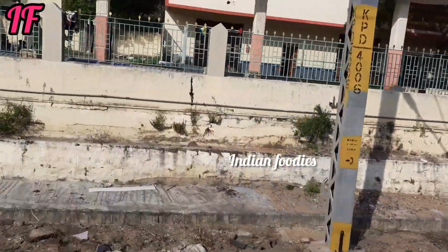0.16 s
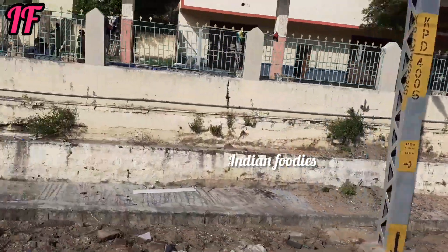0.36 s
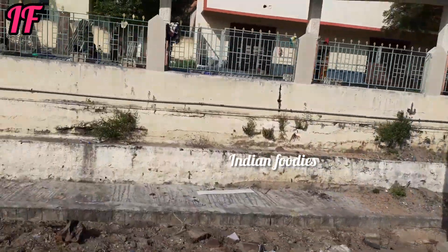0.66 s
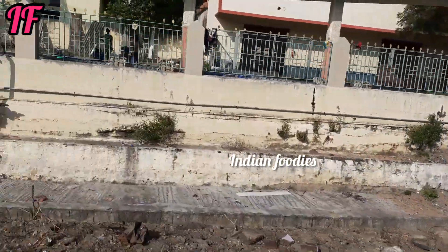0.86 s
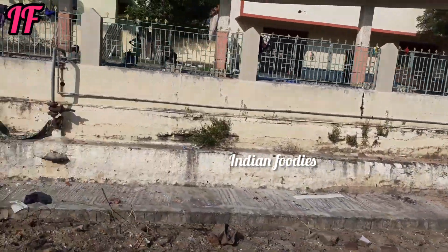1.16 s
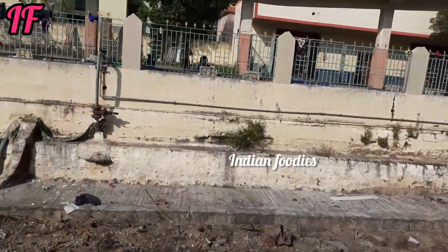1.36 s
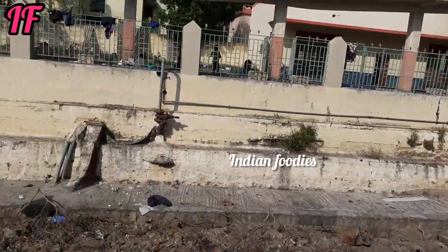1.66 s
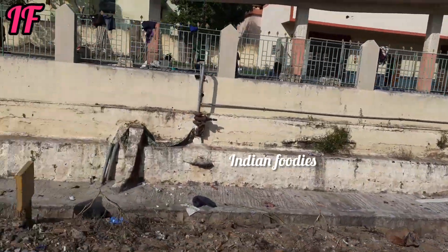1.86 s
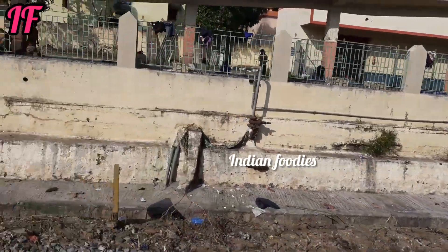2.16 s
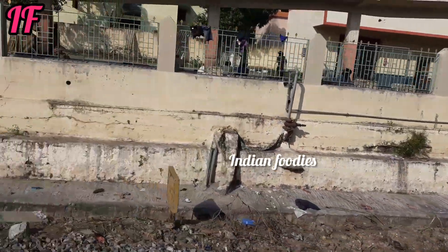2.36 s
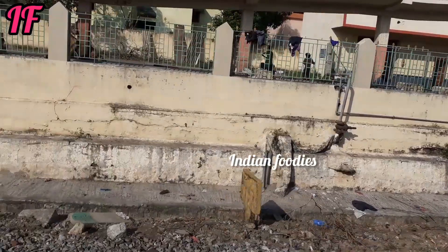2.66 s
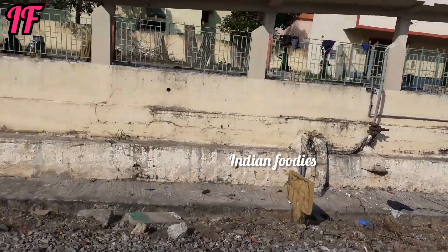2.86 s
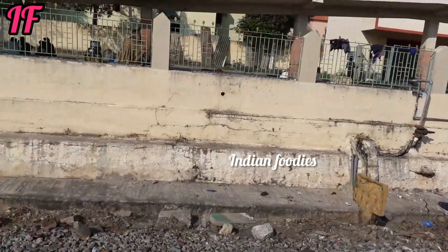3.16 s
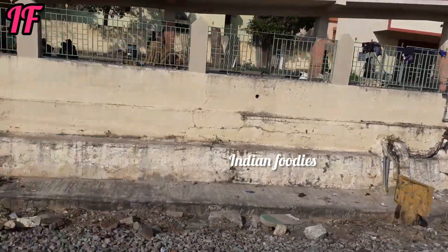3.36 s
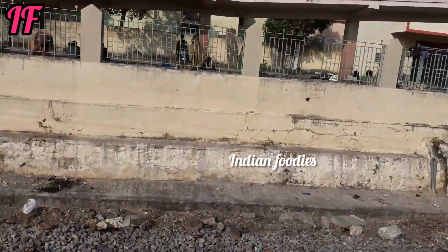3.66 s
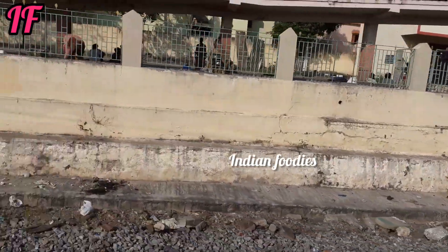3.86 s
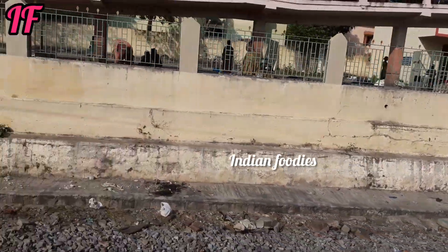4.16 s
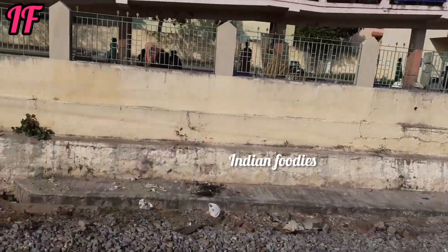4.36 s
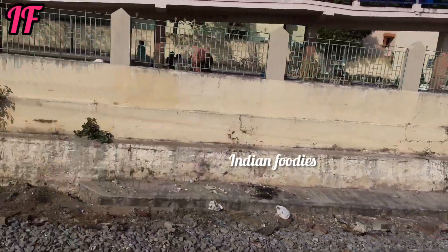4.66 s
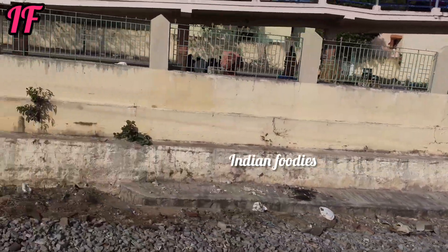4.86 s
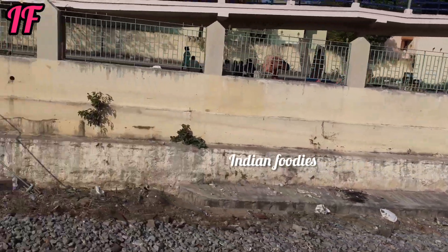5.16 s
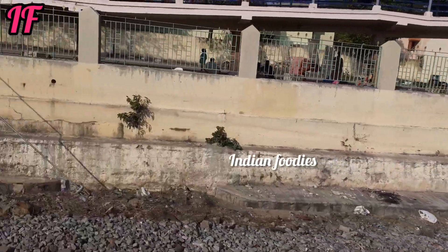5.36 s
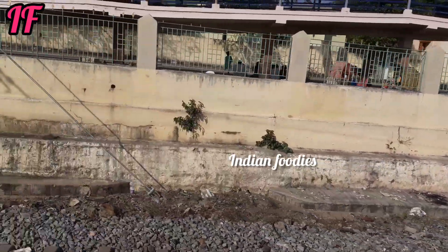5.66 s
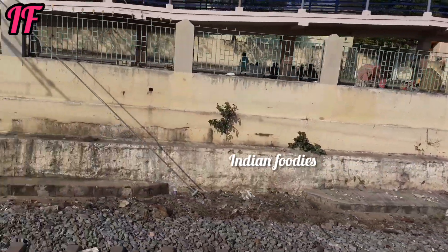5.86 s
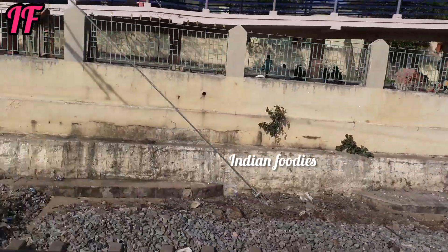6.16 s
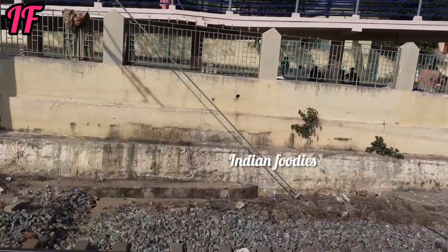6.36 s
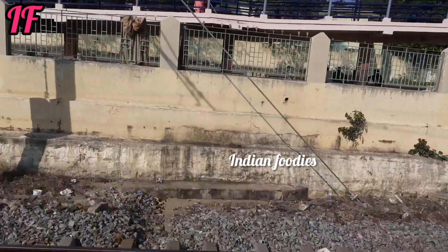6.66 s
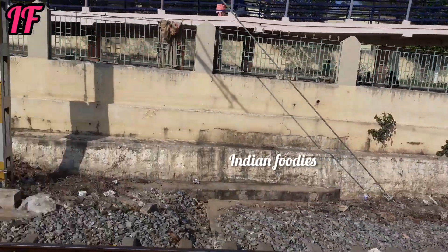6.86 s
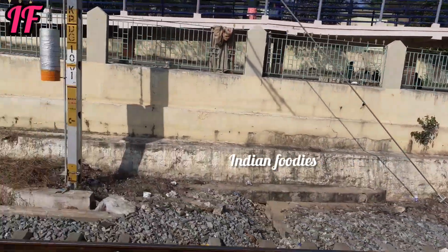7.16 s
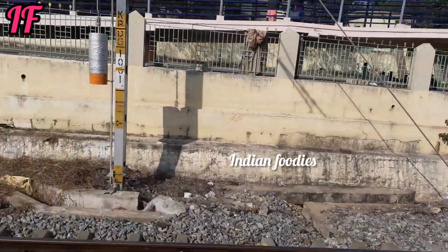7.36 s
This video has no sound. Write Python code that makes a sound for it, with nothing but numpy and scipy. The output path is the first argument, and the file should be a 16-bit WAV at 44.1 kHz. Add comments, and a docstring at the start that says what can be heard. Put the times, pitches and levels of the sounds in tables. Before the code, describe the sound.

Heard in stereo from an open door of a slow passenger train beside a wall: uneven low rumble and roar, bass throbs, clattering rail joints and small rattles. Very high, thin wheel squeals overlap with flickering hiss and metallic grinding for almost five seconds, then thin out. A hard dull knock follows, a short squeal burst, calmer rolling, and a final hiss and bump.

```python
"""Slow train with squealing wheels

A slow passenger train heard from an open carriage door beside a wall. Rough track rumbles and roars as shaped
noise, and the bass near 65 Hz swells and fades. Axles over rail joints, knocks, clanks and rattles excite damped
modes. Wheel flanges rub the rail, hissing and grinding, and stick-slip makes the steel wheels squeal at their
modes. Two spaced microphone ports hear the bass much alike and the treble apart."""
import sys
import numpy as np
from scipy import signal
from scipy.fft import rfft, irfft, next_fast_len
from scipy.io import wavfile
from scipy.ndimage import uniform_filter1d, map_coordinates

SR = 44100
rng = np.random.default_rng(int(sys.argv[2]) if len(sys.argv) > 2 else 0)


def bounce(signal):
    """Save signal as a 16-bit WAV file at the path given by the first command-line argument."""
    frames = np.transpose(np.atleast_2d(signal))
    limited = np.clip(frames, -1, 1)
    pcm = np.round(limited * 32767).astype(np.int16)
    wavfile.write(sys.argv[1], SR, pcm)


N = 331618
FLUTTER_DB_PER_S = 22  # knots a second in the level flutter of squeals and rings


def amp(db):
    """Decibels to an amplitude ratio."""
    return 10 ** (np.asarray(db) / 20)


def unit(x):
    """Normalisation to rms 1."""
    return x / np.sqrt(np.mean(x ** 2) + 1e-20)


def along(points, hz):
    """Interpolation of (frequency_hz, value) points on a logarithmic frequency axis."""
    f, v = np.transpose(points)
    return np.interp(np.log(hz + 1), np.log(f + 1), v)


def curves(rows):
    """Linear envelopes: one value per sample for each column after the time."""
    s, *cols = np.transpose(rows)
    return [np.interp(np.arange(N) / SR, s, c) for c in cols]


def wobble(rate, size=N):
    """Slow random modulation: a smooth curve through random knots, rate of them a second."""
    knots = rng.standard_normal(int(N * rate / SR) + 4)
    return map_coordinates(knots, [np.arange(size) * rate / SR])


def filtered(x, response):
    """Linear filtering: the spectrum of x times a response of frequency."""
    m = next_fast_len(N + SR // 4)
    return irfft(rfft(x, m) * response(np.fft.rfftfreq(m, 1 / SR)), m)[..., :N]


def peak(hz, centre, width):
    """Simple resonance: gain 1 at the centre, 3 dB down at the edges of its width."""
    return 1 / np.sqrt(1 + (2 * (hz - centre) / width) ** 2)


def swell(s, length, rise):
    """Smooth force pulse: a squared sine on warped time; a smaller exponent rise peaks earlier."""
    out = np.zeros(N + SR)
    u = np.linspace(0, 1, round(length * SR))
    out[round(s * SR):][:len(u)] = np.sin(np.pi * u ** rise) ** 2
    return out[:N]


def bumps(t, times, gains_db, half_s):
    """Brief level changes: Gaussian bumps in dB, half_s from the centre to 1/e."""
    return sum(db * np.exp(-((t - s) / half_s) ** 2) for s, db in zip(times, gains_db))


def skirt(half_hz, size):
    """Narrow-band noise: two complex noises through two cascaded one-pole low-passes, so flanks fall steeply."""
    z = rng.standard_normal((2, size)) + 1j * rng.standard_normal((2, size))
    for hz in half_hz, 3 * half_hz:
        z = signal.lfilter([1], [1, -np.exp(-2 * np.pi * hz / SR)], z)
    return z / np.std(z)


def diffuse(gain, broad_db, narrow_db):
    """Partial coherence: noise correlated by frequency between the ports, its level fluctuating by band."""
    # Correlation of the two ports: frequency_hz, correlation (-1 to 1)
    alike = [(80, .74), (430, .78), (690, .52), (860, .25), (980, 0), (1290, -.25), (1470, -.55),
             (1800, -.12), (2300, .1), (3300, -.25), (4000, .25), (5000, 0), (11000, 0), (13000, .15)]
    full_depth_hz = 1800  # the narrow-band fluctuation reaches full depth here
    f, _, z = signal.stft(rng.standard_normal((2, N)), SR, nperseg=1024)
    narrow = uniform_filter1d(rng.standard_normal(z.shape[1:]), size=5, axis=1)
    broad = uniform_filter1d(narrow, size=12, axis=0)
    depth = np.clip(f / full_depth_hz, 0, 1)[:, None]
    field_db = broad_db * unit(broad) + narrow_db * depth * unit(narrow)
    # the fluctuation leaves the mean power of each band about unchanged
    field_db = field_db - field_db.var(1, keepdims=True) * np.log(10) / 20
    pair = signal.istft(z * amp(field_db), nperseg=1024)[1][:, :N]

    def split(hz):
        """Angle that shares power between sum and difference to give the correlation."""
        angle = np.arccos(np.clip(along(alike, hz), -1, 1)) / 2
        return gain(hz) * [np.cos(angle), np.sin(angle)]

    mid, side = filtered(pair, split)
    return np.array([mid + side, mid - side]) / np.std(mid)


def bass_swells(column, fade_s):
    """Exponential envelopes: each swell grows quickly and decays with the time constant fade_s."""
    # Swells of the low rumble and boom: peak_s, boom_db, rumble_db
    swell_rows = [(.04, -33, -30), (.21, -31, -36), (.3, -24, -45), (.35, -32, -47), (.55, -27, -31),
                  (.87, -46, -48), (1.27, -35, -33), (1.37, -34, -33), (1.645, -32, -35),
                  (1.84, -36, -34.5), (1.945, -26.5, -31), (2.14, -24, -38), (2.4, -36, -40),
                  (2.46, -45, -35), (2.55, -45, -35.5), (2.64, -33, -44), (2.85, -51, -34),
                  (3.06, -33, -37), (3.25, -44, -50), (3.3, -48, -37.5), (3.45, -35, -31.5),
                  (3.63, -42, -43), (3.75, -42, -43), (3.92, -36, -37), (3.98, -44, -45), (4.25, -37, -37),
                  (4.54, -47, -41), (4.63, -37, -39), (4.71, -39, -41), (4.88, -44, -41), (5.06, -30, -45),
                  (5.28, -41, -37), (5.35, -30, -34.5), (5.47, -36, -43), (5.67, -37, -44),
                  (5.88, -31, -46), (5.96, -30, -40), (6.09, -36, -30.5), (6.28, -37, -42),
                  (6.62, -34, -49), (6.76, -45, -45.5), (7.1, -36, -48), (7.265, -27, -32),
                  (7.35, -32, -34), (7.46, -33, -41)]
    rise_s = 0.026  # time constant
    t = np.arange(N) / SR
    total = 0
    for row in swell_rows:
        shape = np.exp(np.minimum((t - row[0]) / rise_s, (row[0] - t) / fade_s))
        total = total + amp(row[column]) * shape
    return total


def blows(events, modes, rise_s, scatter_db):
    """Impact response: each blow rings damped modes, the same at both ports, with scattered mode levels."""
    out, t = np.zeros(N + SR), np.arange(SR // 8) / SR
    scatter = scatter_db * rng.standard_normal((len(events), len(modes)))
    for (s, db), spread in zip(events, scatter):
        ring = 0
        for (hz, level, t60), extra_db in zip(modes, spread):
            ring = ring + amp(level + extra_db - 60 * t / t60) * np.sin(2 * np.pi * hz * t)
        out[round(s * SR):][:len(t)] -= amp(db) * ring * (1 - np.exp(-t / rise_s))
    return out[:N]


def track(lumps):
    """Roughness excitation: rough rail shakes the carriage floor and roars off the wall as shaped noise."""
    # Rolling levels: time_s, rumble_db, roar_db
    roll = [(0, -31, -36.5), (.6, -44, -35.5), (.9, -43.5, -38.5), (1.33, -43, -34.5), (1.75, -47, -38.5),
            (2.0, -38.5, -37), (2.45, -45, -38), (2.95, -42, -39), (3.6, -57, -40.5), (4.1, -43, -39),
            (4.45, -56, -40), (5.0, -42, -37.5), (5.55, -52, -39), (5.85, -51, -36.5), (6.4, -51, -40),
            (7.1, -47.5, -36.5), (7.3, -32.5, -34), (7.52, -41, -36.5)]
    # Spectrum of the carriage rumble: frequency_hz, gain_db
    rumble_shape = [(20, -26), (35, -9), (50, 0.5), (65, -8), (85, 3), (100, 0), (120, 1), (160, -4.5),
                    (240, -5.5), (340, -38)]
    # Spectrum of the rolling roar: frequency_hz, gain_db
    roar_shape = [(88, -3.5), (150, -2.5), (484, -5), (1020, -11.5), (1190, -11.5), (1940, -14.5),
                  (2450, -14.5), (2760, -16.5), (2980, -15.5), (5680, -25.5), (6140, -18), (7180, -21),
                  (7620, -36), (14200, -23), (16000, -107)]
    rumble_db, roar_db = curves(roll)
    ripple = wobble(24)
    shaking = np.hypot(amp(rumble_db + 2.6 * lumps), bass_swells(column=2, fade_s=0.036))
    rumble_noise = diffuse(lambda hz: amp(along(rumble_shape, hz)), broad_db=0.0, narrow_db=-4.0)
    roar_noise = diffuse(lambda hz: amp(along(roar_shape, hz)), broad_db=.7, narrow_db=4)
    rumble = shaking * amp(0.57 * ripple) * rumble_noise
    roar = amp(roar_db + 0.5 * lumps + 0.7 * ripple) * roar_noise
    return rumble + roar


def boom(lumps):
    """Narrow-band oscillation: the bass near 65 Hz swells and fades, nearly alike at both ports."""
    floor_hz, idle_db = 65.1, -45  # idle: level between swells, before the lumps
    t = np.arange(N) / SR
    wander = 1.9 * np.array([wobble(18), wobble(18)])  # phase, radians
    mid, side = np.sin(2 * np.pi * floor_hz * t + wander)
    side = .38 * side
    swing = np.hypot(amp(idle_db + 5.1 * lumps), bass_swells(column=1, fade_s=0.027))
    return swing * amp(1.8 * wobble(22)) * np.array([mid + side, mid - side])


def joints():
    """Modal excitation: axles crossing gaps rattle sleepers and rail; a sharper step rings the higher modes."""
    # Axles over rail joints: start_s, level_db, length_s, treble_share (0 to 1)
    crossings = [(0.188, -30.5, 0.21, 0.58), (0.461, -27, 0.21, 0.49), (1.233, -32.5, 0.3, 0.44),
                 (1.565, -30.5, 0.19, 0.38), (1.98, -33.5, 0.22, 0.73), (2.273, -33.5, 0.065, 0.8),
                 (2.314, -31, 0.14, 0.47), (4.085, -40.5, 0.29, .8), (4.987, -37.5, 0.15, 0.58),
                 (5.74, -39, 0.16, 0.9), (6.95, -43.5, 0.26, .8), (7.222, -37, 0.093, 0.3)]
    # Sleeper modes (first two), then higher rail modes: frequency_hz, width_hz, level_db
    rail_modes = [(259, 40, 1.5), (390, 53, 2.5), (575, 37, 0), (766, 290, -1.5), (1040, 110, -10),
                  (1590, 170, -11.5)]
    low_lag_s = 0.017  # the low modes answer after the step
    out = np.zeros((2, N))
    for modes, high in (rail_modes[:2], 0), (rail_modes[2:], 1):
        force = 0
        for s, db, length, share in crossings:
            part = share if high else 1 - share
            force = force + amp(db) * part * swell(s + low_lag_s * (1 - high), length, rise=0.52)
        ring = lambda hz: sum(amp(db) * peak(hz, c, w) for c, w, db in modes)
        out += amp(2.6 * wobble(45)) * force * diffuse(ring, broad_db=.8, narrow_db=1.0)
    return out


def rattles():
    """Damped oscillation: loose parts in the running gear knock, each at its own pitch."""
    # Small knocks: start_s, level_db, pitch_hz
    loose_parts = [(0.124, -28, 178), (0.173, -20, 350), (0.244, -15, 565), (0.261, -18, 248),
                   (0.279, -27, 237), (0.324, -22, 579), (0.476, -22, 468), (0.599, -24, 151),
                   (0.658, -21, 450), (1.384, -27, 221), (1.399, -30, 506), (1.655, -23, 237),
                   (2.029, -27, 799), (2.255, -32, 183), (2.288, -28, 999), (2.291, -27, 638),
                   (2.302, -23, 678), (2.329, -26, 269), (2.439, -25, 175), (2.529, -26, 282),
                   (2.78, -29, 488), (2.886, -26, 396), (2.999, -31, 159), (3.287, -32, 151),
                   (3.39, -30, 223), (3.424, -28, 213), (3.539, -34, 412), (3.721, -34, 151),
                   (3.877, -28, 202), (4.054, -32, 240), (4.089, -32, 490), (4.169, -26, 842),
                   (4.225, -31, 280), (4.279, -28, 151), (4.392, -37, 423), (4.464, -34, 474),
                   (4.601, -29, 183), (4.699, -31, 256), (4.774, -27, 277), (4.824, -28, 170),
                   (4.848, -22, 269), (4.966, -26, 272), (5.136, -31, 662), (5.195, -25, 546),
                   (5.351, -30, 304), (5.464, -33, 170), (5.565, -32, 439), (5.61, -33, 369),
                   (5.668, -33, 285), (6.446, -33, 538), (6.517, -24, 417), (6.641, -21, 482),
                   (6.81, -35, 269)]
    cycles, rise_s = 12.3, 0.0018  # cycles to die by 60 dB; time constant of the onset
    out, t = np.zeros(N + SR), np.arange(SR // 10) / SR
    for s, db, hz in loose_parts:
        decay = amp(db - 60 * t * hz / cycles)
        onset = 1 - np.exp(-t / rise_s)
        out[round(s * SR):][:len(t)] -= decay * np.sin(2 * np.pi * hz * t) * onset
    return out[:N]


def knocks():
    """Panel impact: dull blows ring a few heavily damped modes of the carriage body."""
    # Knocks: start_s, level_db
    knock_rows = [(1.243, -26), (1.919, -23), (2.616, -43), (2.827, -17), (3.414, -44), (3.592, -21.5),
                  (5.259, -11), (5.276, -15), (6.622, -23), (6.746, -14), (7.215, -27), (7.242, -33)]
    # Panel modes: frequency_hz, level_db, t60_s
    panel = [(119, -20, 0.034), (214, 0, 0.038), (320, -20, 0.014)]
    return blows(knock_rows, panel, rise_s=0.0039, scatter_db=1.5)


def clanks():
    """Steel impact: sharp blows of wheel on rail end ring short modes with a quick onset."""
    # Blows: start_s, level_db
    clank_rows = [(0.21, -20), (0.248, -18), (0.271, -15), (0.476, -26), (0.496, -20), (0.516, -18),
                  (0.533, -24), (1.255, -26.5), (1.281, -23), (1.295, -23), (1.343, -28), (1.365, -19),
                  (1.444, -33), (1.636, -26), (1.961, -17), (2.02, -22), (2.064, -23), (2.288, -30),
                  (2.296, -25), (2.358, -22), (2.499, -22), (2.737, -17), (4.136, -28), (4.507, -25),
                  (4.814, -30), (5.033, -26), (5.747, -35), (5.778, -36), (6.145, -18), (6.903, -22)]
    # Modes of a blow: frequency_hz, level_db, t60_s
    clank_modes = [(150, -8, 0.025), (270, -8, 0.022), (410, -5.5, 0.031), (587, -9.5, 0.022),
                   (796, -10, 0.021)]
    return blows(clank_rows, clank_modes, rise_s=0.0012, scatter_db=2.5)


def rings():
    """Modal ringing: a mode of wheel or rail sings for a moment, rough and fluttering."""
    # Brief rings: start_s, pitch_hz, level_db, length_s
    ring_rows = [(.22, 234, -29, .11), (.235, 580, -29, .07), (1.3, 2750, -43, .11), (1.35, 1670, -45, .1),
                 (1.88, 1906, -48, .18), (2.37, 3023, -40, .24), (2.74, 2727, -46, .45),
                 (2.93, 1900, -46, .25), (3.58, 1816, -46, .2), (5.78, 5390, -43, .08),
                 (5.8, 12940, -43, .16), (7.27, 12990, -39, .08), (3.95, 1900, -49, .2),
                 (6.3, 6036, -54, .8), (6.65, 2920, -48, .3), (6.64, 2500, -48, .2)]
    rough_db, skirt_hz, flutter_db = -1, 25, 2.5
    out = np.zeros((2, N))
    for s, hz, db, length in ring_rows:
        span = slice(round(s * SR), round((s + length) * SR))
        t = np.arange(span.start, span.stop) / SR
        # phase drift and roughness are weaker below 1500 Hz
        drift = min(1.2, hz / 1500) * np.array([wobble(35, size=len(t)), wobble(35, size=len(t))])
        rough = min(1, hz / 1500) * amp(rough_db) * skirt(skirt_hz, size=len(t))
        swing = np.exp(1j * drift) + rough
        flutter = flutter_db * wobble(FLUTTER_DB_PER_S, size=len(t))
        level = amp(db + flutter) * swell(s, length, rise=0.92)[span]
        out[:, span] += level * np.real(swing * np.exp(2j * np.pi * hz * t))
    return out


def metallic_grains():
    """Granular texture: many short random sine notes, 2 to 5.8 kHz, make the grind metallic."""
    count, length_s = 2600, .042
    low_hz, high_hz = 2000, 5800
    when, pitch, luck, lean = rng.random((count, 4)).T
    t = np.arange(round(length_s * SR))
    hz = low_hz * (high_hz / low_hz) ** pitch
    strength = amp(-3.5 * np.log(1 - .95 * luck))[:, None]  # few notes are loud
    envelope = np.sin(np.pi * (t / len(t)) ** .6) ** 2
    notes = strength * envelope * np.sin(2 * np.pi * np.outer(hz, t) / SR)
    at = ((when * N).astype(int)[:, None] + t).ravel()
    angle = np.pi * lean - np.pi / 4  # outside the first quadrant the ports oppose
    ports = []
    for gain in (np.cos(angle), np.sin(angle)):
        ports.append(np.bincount(at, (notes * gain[:, None]).ravel(), N + len(t))[:N])
    return unit(np.array(ports))


def flange(chatter):
    """Friction noise: the rubbing flange hisses through the modes of the rim; the treads grind lower down."""
    # Flange against rail: time_s, hiss_db, grind_db
    rub = [(0, -32, -48.5), (.27, -31, -48), (.5, -27, -41), (.67, -31.5, -40), (1.03, -39.5, -49),
           (1.19, -37.5, -48), (1.28, -32, -41.5), (1.55, -39.5, -43), (1.8, -46, -47.5),
           (1.88, -32, -43.5), (1.95, -26.5, -46), (2.15, -26.5, -46.5), (2.33, -37.5, -45),
           (2.47, -24, -38.5), (2.7, -30.5, -44.5), (2.88, -26.5, -33.5), (3.15, -32.5, -41.5),
           (3.46, -27.5, -44), (3.58, -33.5, -47), (3.82, -33.5, -47), (4.0, -29.5, -39), (4.25, -29, -41),
           (4.42, -35.5, -47.5), (4.61, -33.5, -42.5), (4.9, -44, -51), (5.28, -51.5, -50),
           (5.745, -53, -53), (5.77, -37, -45), (5.82, -29, -40), (5.88, -32.5, -45), (5.96, -32.5, -44),
           (6.06, -38, -47.5), (6.2, -47.5, -47), (7.235, -49, -52.5), (7.29, -28.5, -45), (7.52, -33, -43)]
    # Moments of harder grip: centre_s, hiss_gain_db, grind_gain_db
    grips = [(.02, 2.5, 5.5), (.12, 2, 7), (.23, 1, 10.5), (2.73, 2.5, 6.5), (3.28, 1, 3.5),
             (3.45, -0.5, 2.5), (3.63, 6, 6), (3.76, 5, 10.5), (3.89, 4, 7), (4.25, 1.5, 2), (4.48, 3, 2.5),
             (4.82, -0.5, 4), (5.81, 0, 0.5), (5.95, 2, 4), (7.48, 0.5, 3)]
    # Wheel modes that colour the rub: frequency_hz, width_hz, level_db (over the hiss, which it adds to)
    rims = [(4331, 60, -5), (4680, 70, -2), (4953, 25, 2), (6036, 60, -3), (6220, 220, -5), (7724, 70, 2),
            (9403, 70, 2), (11074, 30, 0), (11370, 80, 0), (12323, 90, 0), (12674, 50, -2), (12940, 28, 6),
            (13150, 110, 0), (14046, 90, -3), (15062, 60, 2), (15452, 40, 1)]
    # Spectrum of the hiss: frequency_hz, gain_db
    hiss_shape = [(3500, -17), (5000, -5.5), (6000, -2), (7500, 2), (8500, -2), (10000, -3), (12500, -3),
                  (14500, -0.5), (16000, -2.5)]
    # Spectrum of the grind: frequency_hz, gain_db
    grind_shape = [(1300, -13), (1900, -3.5), (2300, -3), (2900, -3.5), (3800, -2.5), (4600, -1.5),
                   (5500, -13)]
    grip_half_s, grains_db = 0.034, -2
    t = np.arange(N) / SR
    hiss_db, grind_db = curves(rub)
    grip_s, hiss_lift, grind_lift = np.transpose(grips)
    hiss_db = hiss_db + bumps(t, grip_s, hiss_lift, grip_half_s)
    grind_db = grind_db + bumps(t, grip_s, grind_lift, grip_half_s)
    surge = wobble(11)

    def hiss_gain(hz):
        """Resonant colouring: broad hiss lifted at the rim modes."""
        return amp(along(hiss_shape, hz)) * (1 + sum(amp(db) * peak(hz, c, w) ** 2 for c, w, db in rims))

    hiss_noise = diffuse(hiss_gain, broad_db=0.9, narrow_db=3.5)
    hiss = amp(hiss_db + 0.59 * surge + 0.42 * chatter) * hiss_noise
    grind_noise = diffuse(lambda hz: amp(along(grind_shape, hz)), broad_db=.2, narrow_db=5)
    grind = grind_noise + amp(grains_db) * metallic_grains()
    return hiss + amp(grind_db + .3 * surge + .8 * chatter) * grind


def squeals(chatter):
    """Stick-slip oscillation: friction keeps a wheel mode swinging; rough contact shakes its size and phase."""
    # Squealing modes: pitch_hz, wander_rad (scales the phase curves), skirt_half_hz,
    # skirt_over_hz (centre above the mode), skirt_db (over the line)
    wheel = [(4331, 1.6, 60, 10, 7), (4685, 1.2, 60, 0, 5), (6036, 1.2, 55, 5, 2), (7150, 1.5, 150, 50, 7),
             (7724, .9, 42, 0, 1), (12323, .6, 100, 65, -.5), (12674, .7, 45, 0, 3), (14046, .6, 95, 60, 3),
             (15062, .9, 45, 15, 1), (5840, 1.5, 60, 0, 6), (13180, 1.5, 50, 0, 8), (13760, 1.5, 50, 0, 8),
             (6190, 1.5, 60, 0, 6)]
    # For each mode, one curve for each squeal: time_s, level_db
    squeal_curves = [
        [[(.66, -56), (.69, -43), (.78, -49), (.85, -46), (.92, -56)], [(1.55, -53), (1.65, -45), (1.7, -58)],
         [(1.95, -64), (2.1, -33), (2.21, -41), (2.31, -36.5), (2.45, -63)]],
        [[(.6, -55), (.66, -41), (.76, -58)], [(1.54, -51), (1.62, -45), (1.68, -60)]],
        [[(.02, -52), (.065, -39), (.12, -52)], [(1.2, -58), (1.3, -61), (1.55, -46), (1.72, -55)],
         [(1.85, -45), (1.9, -40), (2.0, -55), (2.1, -39), (2.3, -50)], [(2.38, -58), (2.49, -40), (2.56, -48),
         (2.76, -46), (3, -49)], [(3.55, -51), (3.7, -37), (3.78, -41), (3.89, -51), (3.92, -39), (4.3, -61),
         (4.6, -45), (4.75, -49), (4.97, -52), (5.1, -52), (5.5, -58), (5.62, -50.5), (5.72, -57)],
         [(5.78, -53), (5.83, -39), (5.9, -31.5), (5.99, -31.5), (6.08, -43), (6.11, -48), (6.15, -45),
         (6.19, -43), (6.21, -58), (6.26, -49), (6.32, -60)]],
        [[(7.24, -50), (7.29, -31), (7.36, -43)]],
        [[(0, -36), (.36, -31), (.6, -39), (.72, -43), (.92, -42), (1.2, -54)], [(1.45, -54), (1.63, -42),
         (1.85, -47.5), (2.02, -41), (2.16, -35), (2.34, -52), (2.54, -46), (2.59, -32), (2.78, -31.5),
         (3.1, -31.5), (3.4, -26.5), (3.57, -36), (3.95, -32.5), (4.1, -29), (4.3, -34), (4.65, -29),
         (4.8, -43.5), (4.96, -50.5), (5.25, -44.5), (5.5, -61)], [(5.98, -56), (6.07, -57), (6.25, -62),
         (6.39, -59), (6.6, -67)], [(7.27, -49), (7.33, -38), (7.49, -33), (7.52, -34)]],
        [[(1.27, -42), (1.34, -33), (1.5, -31.5), (1.68, -29), (1.74, -37), (1.9, -31), (2.2, -31.5),
         (2.3, -28.5), (2.49, -28), (2.54, -35), (2.64, -36), (2.8, -39), (3.1, -48)], [(5.82, -54),
         (5.88, -37), (5.97, -52), (6.1, -51), (6.18, -44), (6.26, -58)]],
        [[(2.5, -36), (2.7, -46), (2.84, -52), (3.06, -43), (3.42, -42), (3.54, -54), (3.63, -45), (3.92, -37),
         (4.1, -38), (4.2, -50), (4.5, -46), (4.65, -35), (4.8, -59)], [(7.33, -46), (7.42, -38), (7.5, -46)]],
        [[(0, -33), (.15, -31), (.2, -38), (.6, -45)], [(1.88, -46), (2.02, -37), (2.3, -38), (2.5, -49)],
         [(3.3, -44), (3.45, -27.5), (3.72, -30.5), (3.87, -38)], [(4.03, -38), (4.12, -29.5), (4.3, -32),
         (4.45, -39), (4.7, -48)]],
        [[(0, -42), (.4, -38), (.55, -35), (.65, -32), (.95, -33.5), (1.12, -45), (1.25, -54)], [(1.88, -48),
         (2.06, -41), (2.14, -35), (2.34, -37), (2.39, -49), (2.5, -44)], [(7.35, -52), (7.45, -44),
         (7.52, -50)]],
        [[(5.75, -48), (5.78, -42), (5.82, -41), (5.88, -57)]],
        [[(1.9, -48), (2.1, -42), (2.25, -50)], [(3.2, -45), (3.28, -36), (3.5, -52), (3.63, -42), (3.74, -44),
         (4.0, -42), (4.2, -50)]],
        [[(3.55, -50), (3.7, -43), (3.82, -44), (4.05, -44)]],
        [[(.36, -50), (.43, -41), (.55, -51)], [(2.42, -46), (2.52, -38), (2.7, -42), (3.0, -49)], [(3.44, -52),
         (3.5, -38), (3.56, -50)], [(3.88, -50), (3.94, -36), (4.02, -47)]],
    ]
    # For each mode, moments when its squeal flares up: centre_s, gain_db
    flare_rows = [
        [],
        [],
        [],
        [],
        [(.132, 5.5), (.206, 8), (.344, 7.5), (.928, 6), (1.72, 7), (1.78, 6), (2.735, 11.5), (2.83, 3),
         (2.89, 7.5), (2.99, 4), (3.095, 0), (3.14, 6.5), (3.6, 8), (3.76, 5), (3.86, 5), (3.93, 7),
         (4.021, 12.5), (4.052, 11.5), (4.385, 9), (4.545, 7), (4.65, 1), (7.364, 10.5)],
        [(1.494, 10), (1.808, 5), (1.976, 3), (2.094, 2), (2.314, 4.5), (2.468, 5), (2.79, 7), (2.894, 10)],
        [(3.92, 8)],
        [(.072, 6), (3.476, 5), (3.57, 6), (3.72, 3), (4.118, 4), (4.236, 9), (4.302, 4), (4.396, 5)],
        [(.476, 6), (.772, 4)],
        [],
        [],
        [],
        [],
    ]
    flutter_db, flare_half_s, fade_s = 2.2, 0.0085, 0.01
    out = np.zeros((2, N))
    for (hz, wander, half_hz, over_hz, rough_db), tables, flares in zip(wheel, squeal_curves, flare_rows):
        for rows in tables:
            s, db = np.transpose(rows)
            start = round(s[0] * SR)
            t = np.arange(start, min(round(s[-1] * SR), N)) / SR
            span = slice(start, start + len(t))
            pair = lambda rate: np.array([wobble(rate, size=len(t)), wobble(rate, size=len(t))])
            steady = np.exp(1j * wander * (pair(40) + 3 * pair(6)))
            rough = amp(rough_db) * skirt(half_hz, size=len(t)) * np.exp(2j * np.pi * over_hz * t)
            # two paths, straight and off the wall, add at one port and oppose at the other
            near, wall = unit(np.real(np.exp(2j * np.pi * hz * t) * (steady + rough)))
            flutter = flutter_db * wobble(FLUTTER_DB_PER_S, size=len(t))
            flare = bumps(t, *np.reshape(flares, (-1, 2)).T, flare_half_s)
            # a squeal already sounding at time 0 has no fade-in
            since_start = t - s[0] + (s[0] == 0)
            fade = np.clip(np.minimum(since_start, s[-1] - t) / fade_s, 0, 1)
            level = fade * amp(np.interp(t, s, db) + flutter + flare + 0.31 * chatter[span])
            out[:, span] += level * np.array([near + 1.0 * wall, near - 0.95 * wall])
    return out


def scene():
    """Superposition: all sources add, some sharing the bumps of the rail or the chatter of the flange."""
    chatter = wobble(25) + 1.34 * wobble(70)  # the flange catches and lets go
    lumps = wobble(16)  # small bumps of the rail
    background = track(lumps) + boom(lumps) + joints()
    hits = rattles() + knocks() + clanks()
    return background + hits + rings() + flange(chatter) + squeals(chatter)


def record(dry):
    """Phase difference and band limits: the right port leads in the low mids; deep bass and top are cut."""
    # Phase lead of the right port over the left: frequency_hz, lead_rad
    right_leads = [(200, 0), (520, .3), (700, .55), (870, .8), (1000, 0)]
    bass_cut_hz, top_hz = 48, 15750

    def response(hz):
        """Second-order bass roll-off and a sharp upper limit, half the lead applied to each port."""
        lead = np.exp(.5j * np.outer([-1, 1], along(right_leads, hz)))
        bass_cut = hz ** 2 / np.hypot(hz ** 2, bass_cut_hz ** 2)
        return lead * (hz < top_hz) * bass_cut

    return filtered(dry, response)


dry = scene()
out = record(dry)
bounce(out)
```